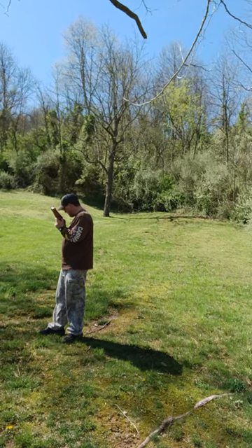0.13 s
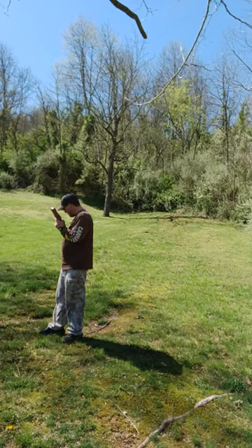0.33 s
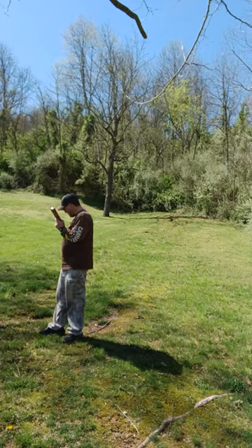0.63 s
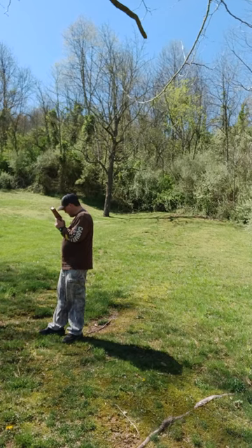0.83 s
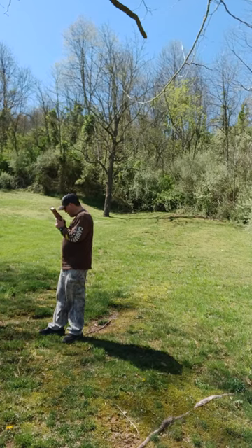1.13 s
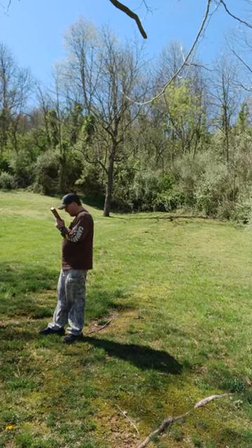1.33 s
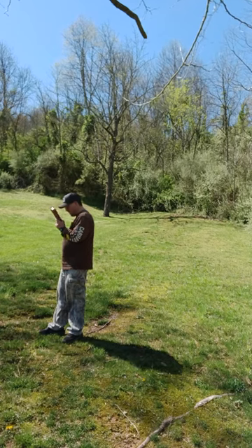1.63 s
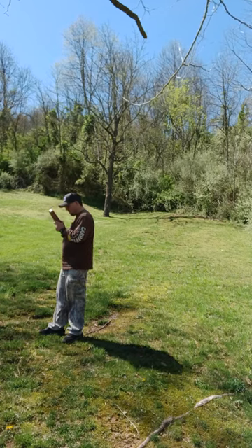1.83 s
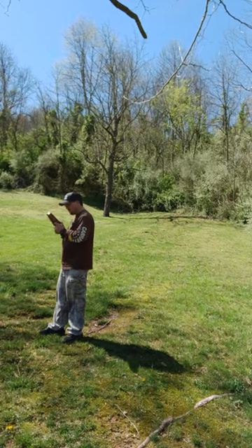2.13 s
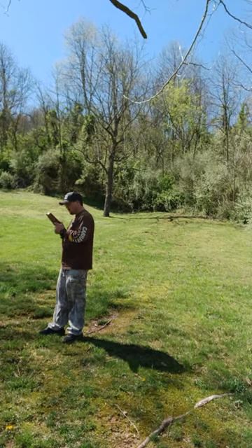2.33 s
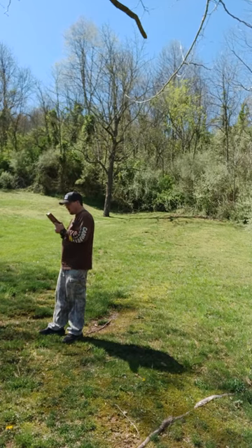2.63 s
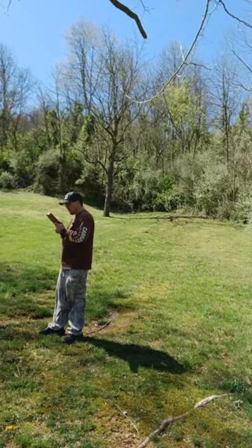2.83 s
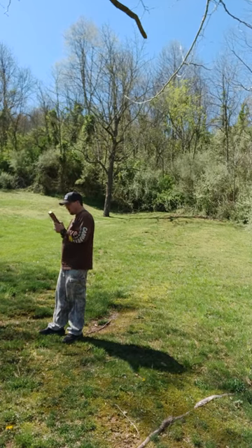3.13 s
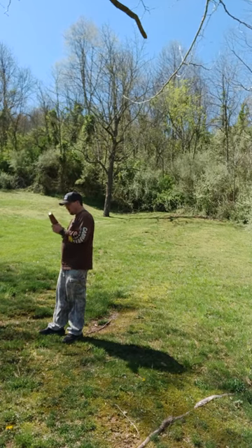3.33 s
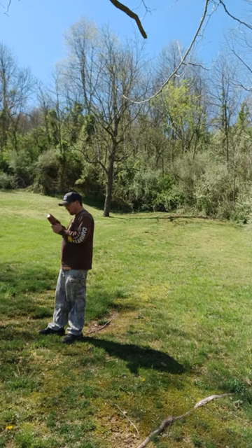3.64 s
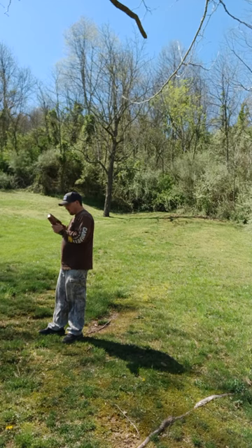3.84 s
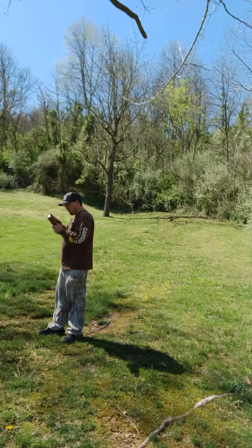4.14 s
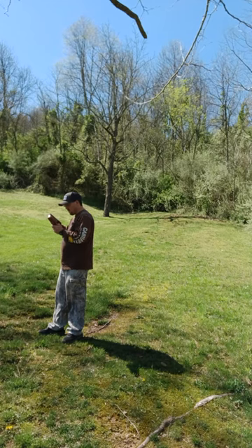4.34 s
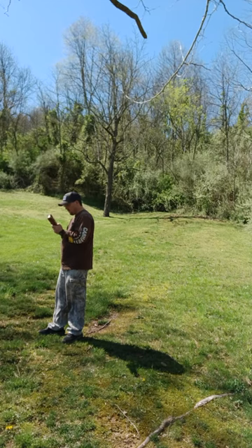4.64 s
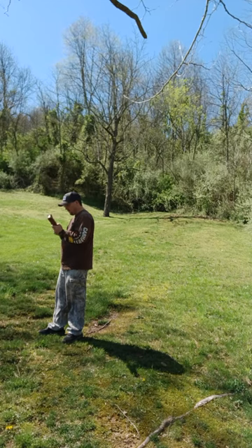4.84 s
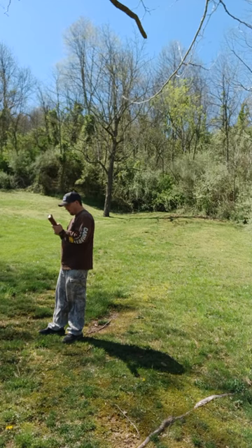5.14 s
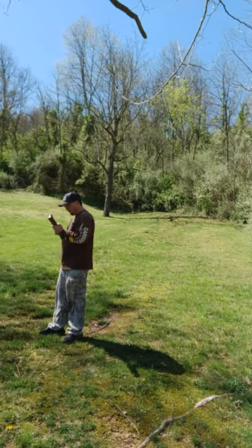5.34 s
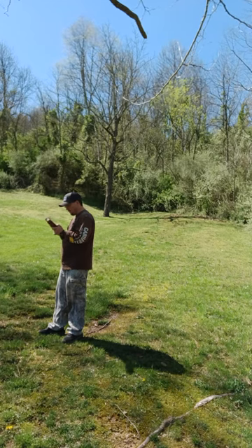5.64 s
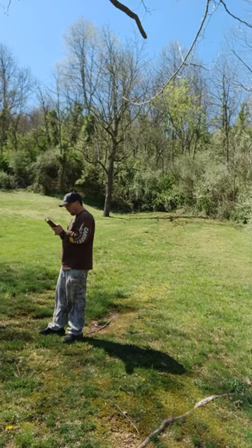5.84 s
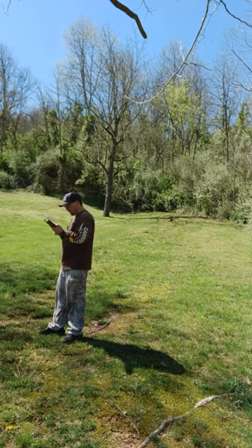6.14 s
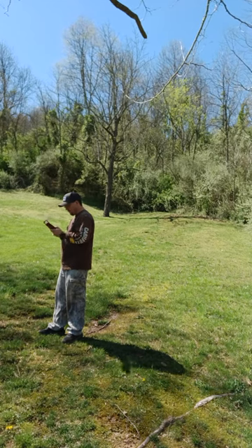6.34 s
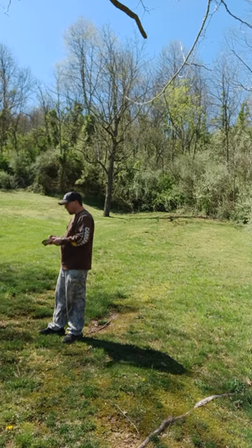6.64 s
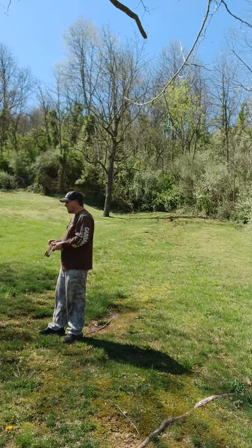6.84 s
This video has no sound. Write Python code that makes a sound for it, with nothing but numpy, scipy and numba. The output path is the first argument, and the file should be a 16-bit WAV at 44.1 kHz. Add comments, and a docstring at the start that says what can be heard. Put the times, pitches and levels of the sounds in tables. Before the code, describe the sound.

A wooden box call scrapes out raspy turkey-like yelps, clucks and a soft purr outdoors, with faint birds and light wind.

```python
"""A wooden box call played in a field: five yelps, four clucks, a soft purr, a whine, two more clucks.
The chalked lid sticks and slips on the box's lip and rings its thin wall, whose note falls as the lid
slides across. Ground, bushes and trees answer faintly. Small birds whistle, a thin trill enters near
the end, and a breeze buffets the two microphone ports over the hush of the field."""
import sys
import numpy as np
from scipy import signal
from scipy.fft import rfft, irfft, next_fast_len
from scipy.io import wavfile
from scipy.ndimage import uniform_filter1d, map_coordinates
from numba import njit

SR = 44100
rng = np.random.default_rng(int(sys.argv[2]) if len(sys.argv) > 2 else 0)


def wav_out(sig):
    """Save sig, one row per channel (or a flat mono array), as 16-bit PCM at SR to the path in sys.argv[1]."""
    wavfile.write(sys.argv[1], SR, np.round(np.clip(np.atleast_2d(sig).T, -1, 1) * 32767).astype(np.int16))


N = 307818

# Long strokes: t/s, length/s, level/dB, pressure peak/s, slide/s, slip rate after slide/Hz,
# last slip rate/Hz, clean part/s, roughness, last wall note/Hz, bite/dB, side wall/Hz, side wall/dB
YELPS = [(0.118, .17, -18.5, 0.069, 0.065, 709.8, 810.7, 0.059, 0.69, 1152, 3.5, 1644, 16),
         (0.456, 0.17, -18.5, 0.099, 0.056, 799.8, 723.3, 0.038, 0.66, 1157, 2, 1804, 16),
         (0.806, .15, -18.5, 0.064, 0.07, 714, 886, .112, 0.32, 1130, 0.5, 2200, 4),
         (1.159, .15, -19.5, 0.093, .05, 703.7, 777, .072, 0.76, 1130, 1, 960, -3),
         (1.498, .159, -20, 0.078, .028, 690, 712.6, .07, .75, 1056, -0.5, 1453, -16)]


def yelps(catch_hz=917.3, rasp_start_hz=783, break_s=0.017, wall_start_hz=1841, wall_settled_hz=1459,
          wall_slide_s=0.055, settled_rough=0.079, slide_rough=0.26, swell_db=10.5, fade_db=11):
    """A clean note slides down and swells, then breaks into a rasp while the wall's note keeps falling."""
    out, box = np.zeros(N), box_ring()
    for (start, length, db, peak_s, slide_s, low_hz, last_hz, clean_s, rasp,
         last_wall_hz, bite_db, side_hz, side_db) in YELPS:
        t, u = stroke_times(length)
        slid = np.clip(t / slide_s, 0, 1)
        broken = np.clip((t - clean_s) / break_s + 0.5, 0, 1)
        rasp_done = np.clip((t - clean_s) / (length - clean_s), 0, 1)
        clean_hz = low_hz + (catch_hz - low_hz) * (1 - slid) ** 1.2
        rasp_hz = rasp_start_hz + (last_hz - rasp_start_hz) * rasp_done ** 2
        slip_hz = clean_hz + broken * (rasp_hz - clean_hz) + 7 * wobble(69.6, len(t))
        wall_hz = np.interp(t, [0, min(slide_s, wall_slide_s)], [wall_start_hz, wall_settled_hz])
        to_go = np.clip((length - t) / (length - wall_slide_s), 0, 1)
        wall_hz += (last_wall_hz - wall_settled_hz) * (1 - to_go ** 1.1)
        clean_rough = settled_rough + (slide_rough - settled_rough) * np.sin(np.pi * slid ** 2)
        rough = clean_rough + broken * (rasp - clean_rough)
        from_peak = np.interp(t, [0, peak_s, length], [-1, 0, 1])
        pressure = amp(db - np.where(from_peak < 0, swell_db, fade_db) * from_peak ** 2)
        sound = firm_stroke(box, slip_hz, wall_hz, rough, bite_db, side_hz, side_db + 10 * (0.5 - u))
        add(out, start, sound * pressure * contact(t, length, attack_s=0.013, release_s=0.023))
    return out


# Short strokes: t/s, length/s, level/dB, roughness, last wall note/Hz, bite/dB, side wall/Hz, side wall/dB
CLUCKS = [(2.118, 0.0157, -39.5, 1, 1332, -20, 2200, 17.5), (2.326, 0.062, -17.5, .9, 1200, 8, 1356, 7.5),
          (2.677, .026, -40.5, 1.13, 1107, 2, 970, 21), (2.986, .054, -25.5, 0.82, 1099, 4, 1025, 10),
          (5.754, 0.062, -18, 0.84, 1309, 1, 2760, 4), (6.057, .076, -19.5, 0.79, 1271, 1.5, 2710, 6)]


def clucks(catch_hz=966.7, last_hz=709.3, wall_start_hz=2000, drop_share=0.17, break_s=0.0078, fade_db=5):
    """One flick: the lid rasps almost at once and the wall's note drops straight away."""
    out, box = np.zeros(N), box_ring()
    for start, length, db, rasp, last_wall_hz, bite_db, side_hz, side_db in CLUCKS:
        t, u = stroke_times(length)
        slip_hz = catch_hz + u * (last_hz - catch_hz)
        wall_hz = last_wall_hz + (wall_start_hz - last_wall_hz) * np.exp(-(u / drop_share) ** 2)
        rough = rasp * np.clip(t / break_s, 0, 1)
        sound = firm_stroke(box, slip_hz, wall_hz, rough, bite_db + 6 * (0.5 - u), side_hz, side_db)
        touch = contact(t, length, attack_s=0.25 * length, release_s=0.36 * length)
        add(out, start, sound * amp(db - fade_db * u) * touch)
    return out


def stroke_times(length_s, tail_s=0.04):
    """Times through a stroke and its ring-out, and the share of the stroke done."""
    t = np.arange(round((length_s + tail_s) * SR)) / SR
    return t, np.clip(t / length_s, 0, 1)


def contact(t, length_s, attack_s, release_s, lift_db=14, ring_out_s=0.0028):
    """The lid lands, holds, eases off and lifts."""
    easing = np.clip((t - length_s + release_s) / release_s, 0, 1)
    ring_out = np.exp(-np.maximum(t - length_s, 0) / ring_out_s)
    return np.clip(t / attack_s, 0, 1) * amp(-lift_db * easing ** 2) * ring_out


def firm_stroke(box, slip_hz, wall_hz, rough, bite_db, side_hz, side_db,
                wall_db=10, upper_db=7, chalk_db=-24, bite_hz=2600, flutter_db=2):
    """Slips and chalk grit ring two gliding wall modes, the side wall and the hollow box."""
    n = len(slip_hz)
    rough = np.clip(rough, 0, 1) + 0.018
    chalk = amp(chalk_db + 5 * wobble(460, n)) * np.sqrt(rough) * rng.standard_normal(n)
    force = unit(slips(slip_hz, wall_hz, rough)) + chalk
    wall = amp(wall_db) * gliding_ring(force, wall_hz, width_hz=105.0)
    upper = amp(upper_db) * rough * gliding_ring(force, 1.168 * wall_hz, width_hz=200.0)
    side = amp(side_db) * rough * steady_ring(force, side_hz, width_hz=150)
    # A hard bite makes each slip abrupt, adding treble.
    treble = filtered(force, lambda hz: hz ** 4 / (hz ** 4 + bite_hz ** 4))
    bite = (amp(bite_db + flutter_db * wobble(90, n)) - 1) * treble
    sound = signal.fftconvolve(force + bite + wall + upper + side, box)[:n]
    # Levelled, so that hand pressure sets the strength.
    running_rms = np.sqrt(np.abs(uniform_filter1d(sound ** 2, size=400)) + 1e-9)
    return sound / running_rms * amp(flutter_db * rough * wobble(222, n))


def slips(slip_hz, wall_hz, rough, pull=0.18, scatter=0.12, uneven_db=4, wander_hz=50):
    """One pulse per slip; the swinging wall hurries or delays each one, which makes the rasp."""
    n = len(slip_hz)
    turns = np.cumsum(slip_hz) / SR
    at = np.interp(np.arange(1, turns[-1]), turns, np.arange(n))
    i = at.astype(int)
    wall_turns = np.cumsum(wall_hz + wander_hz * rough * wobble(252, n)) / SR
    swing = np.sin(2 * np.pi * np.interp(at, np.arange(n), wall_turns))
    jitter, strength = rng.standard_normal((len(at), 2)).T
    at += rough[i] * (pull * swing + scatter * jitter) * SR / slip_hz[i]
    taps = np.floor(at)[:, None] + np.arange(-7, 9)
    offset = taps - at[:, None]
    pulses = np.sinc(offset) * np.sinc(offset / 8)  # band-limited, between samples
    pulses *= amp(uneven_db * rough[i] * strength)[:, None]
    return np.bincount(np.clip(taps, 0, n - 1).astype(int).ravel(), pulses.ravel(), n)


# Radiation of the hollow box: f/Hz, level/dB
BOX_SPECTRUM = [(450, -20.5), (600, -19.5), (740, -10.5), (980, -10), (1200, 0), (1550, -2.5), (2200, -6.5),
                (3400, -8.5), (4600, -12.5), (6000, -19.5), (7100, -22.5), (8400, -38), (10500, -21),
                (15500, -55)]
# Box resonances: f/Hz, width/Hz, level/dB
BOX_MODES = [(740, 420, -9.5), (1182, 90, -2.5), (1439, 218, 5.5), (1910, 67, 2), (2845, 137, 4),
             (2994, 280, 0), (4300, 22, -23)]


def box_ring(size=4096):
    """The box's minimum-phase response to one slip: a broad colour with resonances on it."""
    hz = np.fft.rfftfreq(size, 1 / SR)
    peaks = sum(amp(db) / (1 + (2 * (hz - centre) / width) ** 2) for centre, width, db in BOX_MODES)
    cepstrum = irfft(np.log(amp(along(BOX_SPECTRUM, hz)) * (1 + peaks)))
    cepstrum[1:size // 2] *= 2
    cepstrum[size // 2:] = 0
    return irfft(np.exp(rfft(cepstrum)))[:size // 2]


# Lid taps: t/s, length/s, level/dB
PURR_TAPS = [(3.919, 0.029, -40.5), (3.964, 0.025, -35), (4.03, 0.017, -27), (4.067, 0.023, -27.5),
             (4.112, 0.021, -29.5), (4.176, 0.015, -40), (4.205, 0.024, -29), (4.262, 0.023, -28),
             (4.306, 0.016, -34), (4.337, 0.023, -29), (4.374, 0.023, -30), (4.411, 0.034, -34)]
# Slip rate: t/s, f/Hz
PURR_PITCH = [(3.925, 844), (3.943, 837.3), (4.083, 869), (4.411, 841), (4.44, 820.0)]


def purr():
    """A run of light, gritty taps of the lid."""
    return light_strokes(PURR_TAPS, PURR_PITCH, glide_hz=-34.5, edge_db=-4.5, grit_db=-16,
                         grit_fall_db=14, arch=0.9, lean=0.99, shake_db=3)


# Light strokes: t/s, length/s, level/dB
WHINE_STROKES = [(5.007, 0.093, -42.5), (5.119, 0.026, -40), (5.154, 0.023, -36.5), (5.184, 0.095, -33.5),
                 (5.277, 0.025, -39.5)]
# Slip rate: t/s, f/Hz
WHINE_PITCH = [(5.015, 874.2), (5.047, 862), (5.077, 915), (5.151, 876), (5.207, 872), (5.298, 910.6)]


def whine():
    """Light strokes drawn out, cleaner and brighter than the purr."""
    return light_strokes(WHINE_STROKES, WHINE_PITCH, glide_hz=12, edge_db=4.5, grit_db=-20.5,
                         grit_fall_db=5, arch=0.63, lean=1.17, shake_db=2.9)


# Harmonics of even slipping: multiple, level/dB
HARMONICS = [(1, -15.5), (2, 3), (3, -2), (4, -3.5), (5, -16), (6, -13), (7, -20), (8, -24.5), (12, -29)]


def light_strokes(strokes, pitch, glide_hz, edge_db, grit_db, grit_fall_db, arch, lean, shake_db):
    """The lid catches with a short scratch, then slips evenly in a clean stack of harmonics."""
    out, box = np.zeros(N), box_ring()
    for start, length, db in strokes:
        u = progress(length)
        n = len(u)
        slip_hz = curve(pitch, start + u * length) + glide_hz * (u - 0.5) + 3 * wobble(290, n)
        phase = 2 * np.pi * np.cumsum(slip_hz) / SR
        tone = np.zeros(n)
        for k, harmonic_db in HARMONICS:
            gain = amp(harmonic_db + edge_db * (k >= 5) + 0.5 * rng.standard_normal())
            tone += gain * np.sin(k * phase + rng.uniform(0, 2 * np.pi))
        chalk = rng.standard_normal(n)
        chalk = np.gradient(chalk) + amp(13) * steady_ring(chalk, hz=2050, width_hz=450)
        grit = amp(grit_db + grit_fall_db * (0.5 - u)) * unit(signal.fftconvolve(chalk, box)[:n])
        swell = np.abs(np.sin(np.pi * u ** lean))
        sound = swell ** arch * unit(tone) + np.sqrt(swell) * grit
        add(out, start, amp(db + shake_db * wobble(243, n)) * sound)
    return out


# Return strokes: start t/s, end t/s, level/dB
SWISHES = [(0, 0.06, -48), (0.31, 0.41, -52.5), (0.659, 0.748, -57), (0.99, 1.072, -53),
           (4.658, 4.803, -62), (4.826, 4.972, -59.5)]


def swishes():
    """Sliding back without pressure, the lid only rubs softly on the chalk."""
    out, box = np.zeros(N), box_ring()
    for start, end, db in SWISHES:
        u = progress(end - start)
        chalk = rng.standard_normal(len(u))
        chalk += amp(10) * steady_ring(chalk, hz=1750, width_hz=800)
        rub = unit(signal.fftconvolve(chalk, box)[:len(u)])
        add(out, start, amp(db) * np.sin(np.pi * u) * rub)
    return out


# Left port's phase lead: f/Hz, phase/rad
PORT_LEAD = [(0, 0), (450, 0.1), (750, 0.5), (1210, 0.9), (2150, 5.9), (2580, 6.5), (3100, 11.3),
             (4650, 14.4), (5770, 16.5), (7670, 15.6), (8350, 14.2), (8790, 15.0), (10400, 16.7),
             (11400, 16.1), (13200, 19.5), (16100, 27.0)]
# Port colour, left minus right: f/Hz, level/dB
PORT_TILT = [(60, -3.0), (99, -3.0), (160, -1.5), (270, -1.0), (450, -1.0), (740, -2.0), (1220, -3.0),
             (2010, -2.5), (3330, -0.5), (5500, -3.5), (9080, 0.0), (15000, 0.0)]


def ports(x, right_db=0.56):
    """The call reaches each port with its own phase and colour, plus an overall lean to the right."""
    def response(hz):
        left = amp(along(PORT_TILT, hz) / 2) * np.exp(0.5j * along(PORT_LEAD, hz))
        return np.array([left, 1 / left])
    return filtered(x, response) * amp([[-right_db], [right_db]])


# Tree line's decay before scaling: f/Hz, T60/s
TREE_DECAY = [(500, 0.94), (1500, 0.96), (4000, 1), (10000, 0.098)]


def scattered(x, t60_scale):
    """Outdoor scatter: a diffuse tail for each port, its top dying first."""
    hz, t, noise = signal.stft(rng.standard_normal((2, SR)), SR, nperseg=256)
    t60_s = t60_scale * along(TREE_DECAY, hz)[:, None]
    tail = signal.istft(noise * amp(-60 * t / t60_s), SR, nperseg=256)[1]
    delayed = np.pad(x, (60, 0))[None]
    return signal.fftconvolve(delayed, tail / np.linalg.norm(tail[0]), axes=1)[:, :N]


# Bird notes: start t/s, end t/s, first f/Hz, last f/Hz, level/dB, buzz depth/Hz
BIRD_NOTES = [(1.118, 1.227, 8070, 6800, -68, 44), (1.344, 1.488, 7740, 6680, -64.5, 44),
              (1.764, 1.824, 7800, 6660, -63.5, 53), (1.8, 1.89, 6920, 6670, -62, 53),
              (1.456, 1.488, 4130, 3950, -43, 10), (1.655, 1.694, 4020, 3907, -43.5, 10),
              (1.867, 1.899, 3920, 3947, -42, 11), (1.923, 2.119, 3200, 2875, -56.5, 237),
              (2.23, 2.241, 5760, 4650, -55, 100), (2.572, 2.617, 5370, 5370, -47.5, 59),
              (2.631, 2.662, 5400, 5320, -54, 43), (2.741, 2.766, 2870, 2814, -56, 24)]


def birds():
    """Whistles, most sliding down to settle; a fast waver turns some into buzzes."""
    out = np.zeros(N)
    for start, end, first_hz, last_hz, db, buzz_hz in BIRD_NOTES:
        u = progress(end - start)
        hz = last_hz + (first_hz - last_hz) * (1 - u) ** 2.2 + buzz_hz * wobble(990, len(u))
        whistle = unit(np.sin(2 * np.pi * np.cumsum(hz) / SR))
        add(out, start, amp(db) * np.sin(np.pi * u) * whistle)
    return out


def trill(start_s=6, fade_in_s=0.3, centre_hz=4394, width_hz=522, db=-67):
    """A thin, steady shrilling far off in the grass."""
    noise = rng.standard_normal((2, N))
    band = filtered(noise, lambda hz: 1 / (1 + (2 * (hz - centre_hz) / width_hz) ** 2))
    return amp(db) * np.clip((np.arange(N) / SR - start_s) / fade_in_s, 0, 1) * unit(band)


# Breeze on the microphone: t/s, level/dB
BREEZE_LEVEL = [(0, -46), (.6, -46), (.85, -54), (1.3, -45.5), (1.9, -56), (2.5, -58), (3.85, -60),
                (4.1, -39.5), (4.25, -30), (4.42, -28.5), (4.55, -51), (4.8, -44), (5.05, -52),
                (5.7, -48.5), (6.4, -41), (6.6, -45.5), (6.98, -64)]
# Single eddies: t/s, level/dB
THUMPS = [(.13, -35.5), (.47, -36), (0.649, -36.5), (1.25, -39), (2.07, -44), (3.08, -45.5), (3.26, -44),
          (4.22, -23.5), (4.34, -23.5), (5.25, -40.5), (5.46, -36), (5.868, -34), (6.12, -35), (6.22, -35),
          (6.379, -32.5), (6.469, -26)]
# Buffeting: f/Hz, level/dB
BUFFET_SPECTRUM = [(12, -40), (20, -9.5), (37, -18), (65, 2), (86, 2.5), (233, -19.5), (353, -22.5),
                   (392, -28.5), (700, -43), (910, -71.5), (1540, -120)]


def breeze(gain_db=3, eddy_db=3, lumps_db=1.5, right_db=1, thump_half_s=0.027):
    """Eddies buffet each port with its own rumble; single ones thump."""
    t = np.arange(N) / SR
    wind = amp(curve(BREEZE_LEVEL, t) + eddy_db * wobble(18, N))
    thumps = sum(amp(db) * np.exp(-np.minimum(((t - s) / thump_half_s) ** 2, 20)) for s, db in THUMPS)
    lumps = amp(lumps_db * np.array([wobble(28, N), wobble(25, N)]))
    rumble = unit(lumps * rush(BUFFET_SPECTRUM, coherence=0.17))
    return amp(gain_db) * np.hypot(wind, thumps) * rumble * amp([[-right_db], [right_db]])


# Air in the trees: t/s, level/dB
AIR_LEVEL = [(0, -55), (1.3, -56), (2.3, -56.5), (3.4, -57.5), (4.2, -53.5), (4.65, -55), (6.4, -53),
             (6.98, -56.5)]
# Hush of the field: f/Hz, level/dB
AIR_SPECTRUM = [(88, -38), (150, -8.5), (367, -11), (455, -12.5), (531, -12), (815, -16.5), (1050, -14.5),
                (1810, -21.5), (2030, -19.5), (3120, -25), (4350, -23), (5930, -32), (8420, -44),
                (11100, -31.5), (15700, -35.5)]


def air(flutter_db=0.7):
    """Air in the trees makes a gently wavering hush."""
    level_db = curve(AIR_LEVEL, np.arange(N) / SR) + flutter_db * wobble(3.94, N)
    return amp(level_db) * rush(AIR_SPECTRUM, coherence=0.33)


def rush(spectrum, coherence):
    """Stereo noise of rms 1, partly shared by both ports."""
    shared, own = rng.standard_normal(N), rng.standard_normal((2, N))
    noise = np.sqrt(coherence) * shared + np.sqrt(1 - coherence) * own
    return unit(filtered(noise, lambda hz: amp(along(spectrum, hz))))


@njit
def gliding_ring(x, hz, width_hz):
    """A resonance of peak gain 1 whose note moves."""
    y, z = np.zeros(len(x)), 0j
    for i in range(len(x)):
        z = z * np.exp((2j * hz[i] - width_hz) * np.pi / SR) + x[i]
        y[i] = 2 * np.pi * width_hz / SR * z.real
    return y


def steady_ring(x, hz, width_hz):
    """A resonance on one note."""
    return gliding_ring(x, np.full(len(x), float(hz)), float(width_hz))


def amp(db):
    """Decibels to gain."""
    return 10 ** (np.asarray(db) / 20)


def unit(x):
    """Scaled to rms 1."""
    return x / np.sqrt(np.mean(x ** 2) + 1e-20)


def along(points, hz):
    """(f/Hz, value) points read on a log axis."""
    f, values = np.transpose(points)
    return np.interp(np.log(hz + 1), np.log(f + 1), values)


def curve(points, t):
    """(t/s, value) points read at times t."""
    return np.interp(t, *np.transpose(points))


def progress(length_s):
    """A ramp from 0 to 1."""
    return np.linspace(0, 1, max(round(length_s * SR), 2))


def wobble(rate_hz, n):
    """A smooth random curve of n samples, rate_hz knots a second."""
    knots = rng.standard_normal(int(n * rate_hz / SR) + 4)
    return map_coordinates(knots, [np.arange(n) * rate_hz / SR])


def filtered(x, response):
    """x through a complex frequency response."""
    n = x.shape[-1]
    size = next_fast_len(n + 8192, True)
    return irfft(rfft(x, size) * response(np.fft.rfftfreq(size, 1 / SR)), size)[..., :n]


def add(track, start_s, x):
    """Mix x into the track."""
    part = track[round(start_s * SR):][:len(x)]
    part += x[:len(part)]


def scene(firm_db=2, light_db=1, ground_db=-11, bushes_db=-24, trees_db=-32, bird_db=-2, bird_wet_db=-3):
    """The call is near, with quick scatter off ground and bushes; the birds sit deep in the trees."""
    light = amp(light_db) * (purr() + whine())
    firm = amp(firm_db) * (yelps() + clucks())
    call = firm + light + swishes()
    song = amp(bird_db) * birds()
    echoes = amp(ground_db) * scattered(call, t60_scale=0.064)
    echoes += amp(bushes_db) * scattered(call, t60_scale=0.25)
    echoes += amp(trees_db) * scattered(call, t60_scale=0.83)
    echoes += amp(bird_wet_db) * scattered(song, t60_scale=0.33)
    return ports(call) + echoes + song + trill() + breeze() + air()


def record(dry, top_hz=15780):
    """Brick-wall low-pass."""
    return filtered(dry, lambda hz: hz < top_hz)


dry = scene()
out = record(dry)
wav_out(out)
```